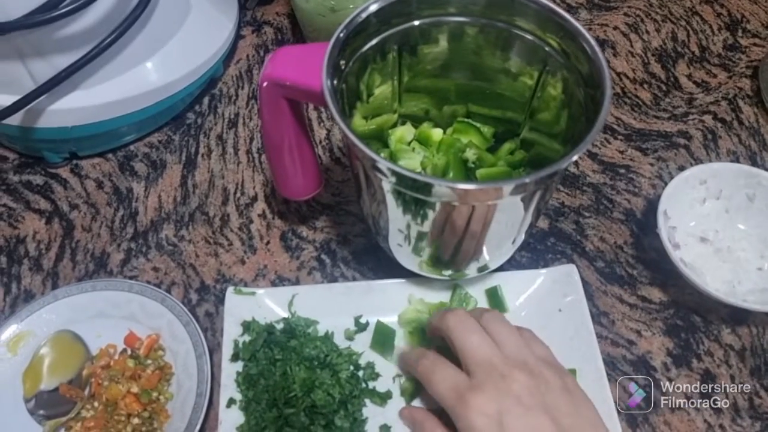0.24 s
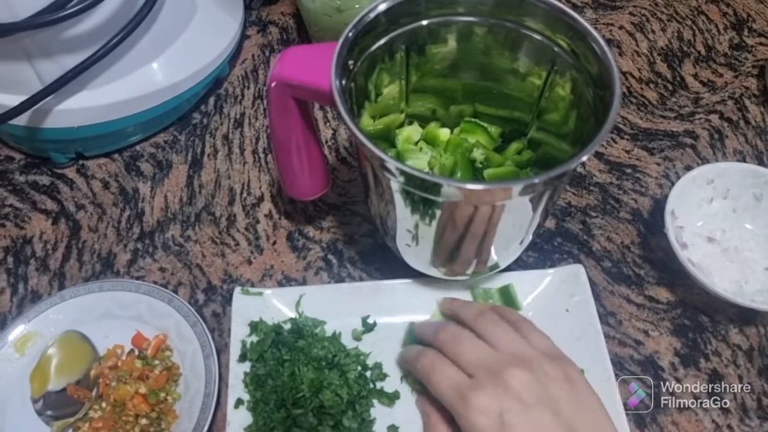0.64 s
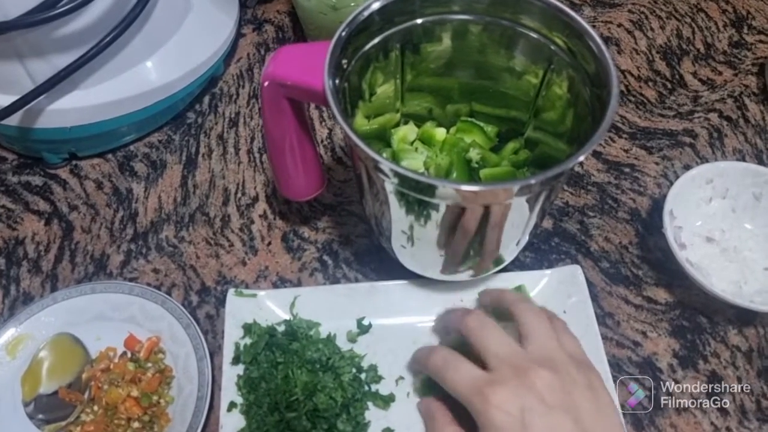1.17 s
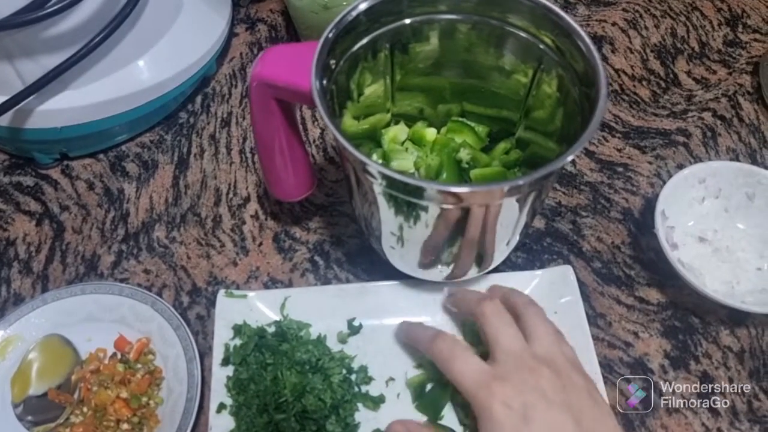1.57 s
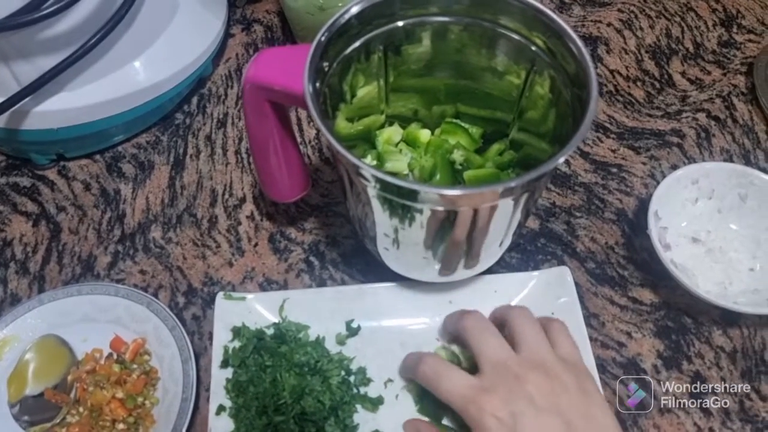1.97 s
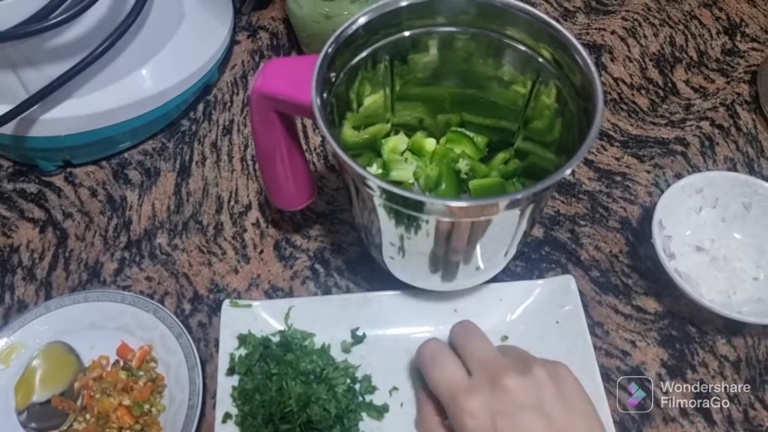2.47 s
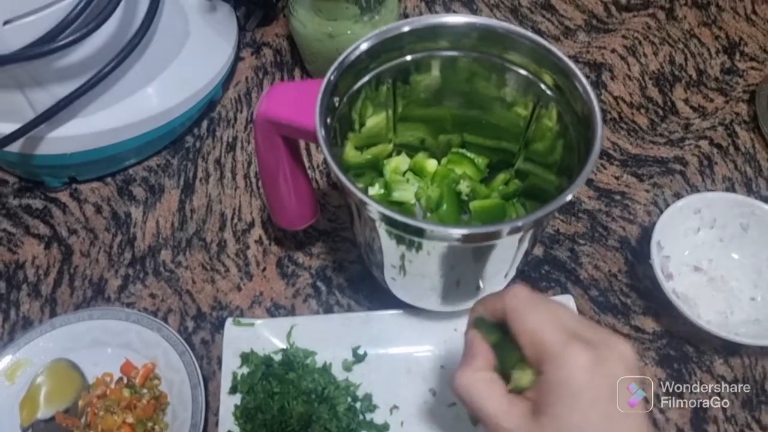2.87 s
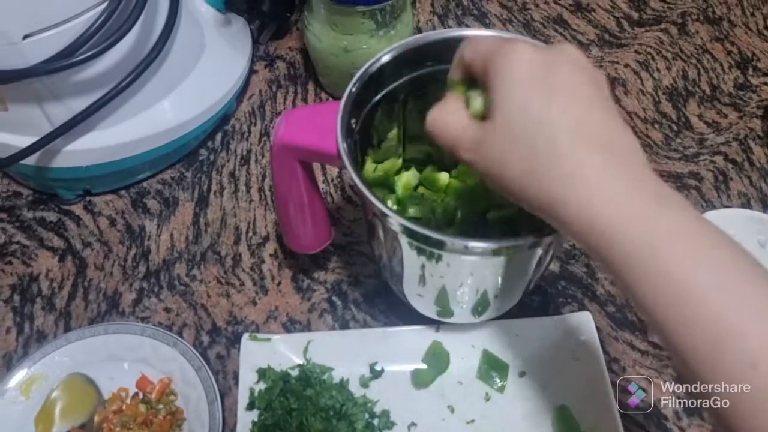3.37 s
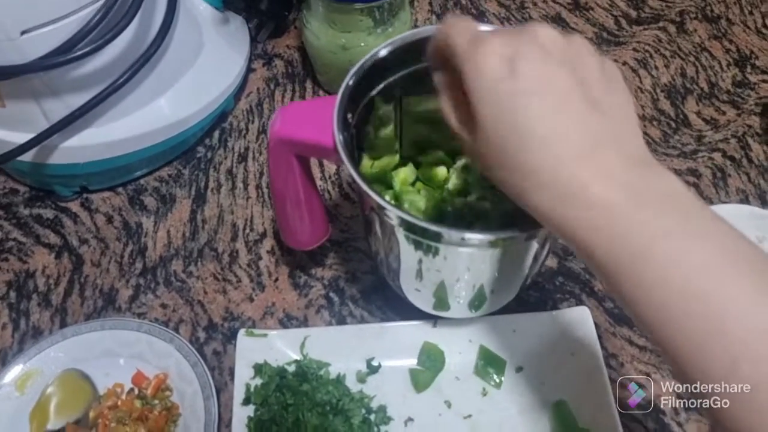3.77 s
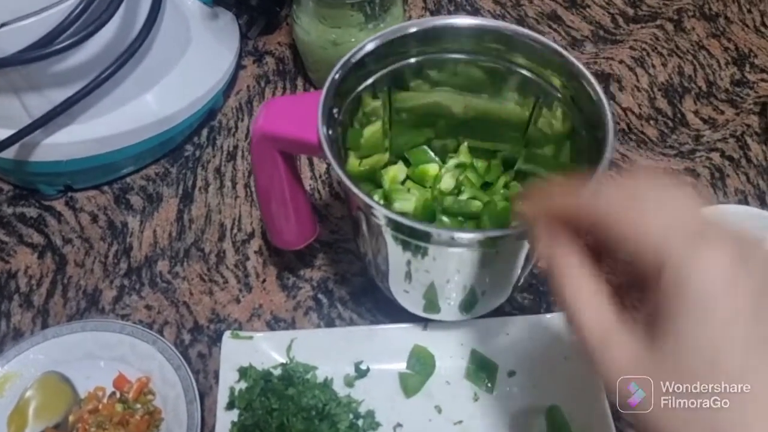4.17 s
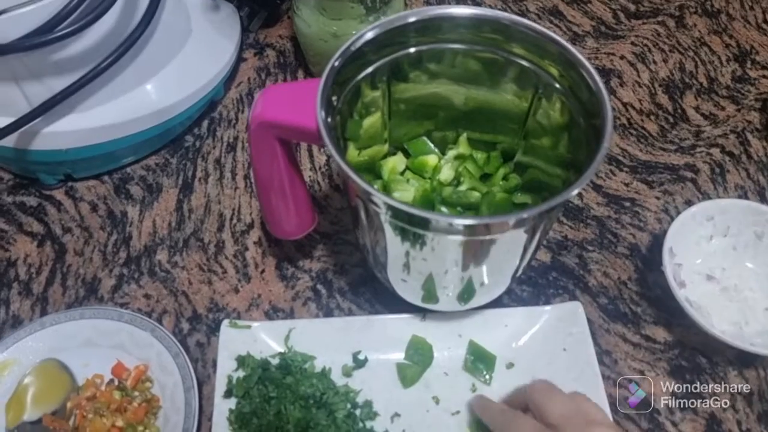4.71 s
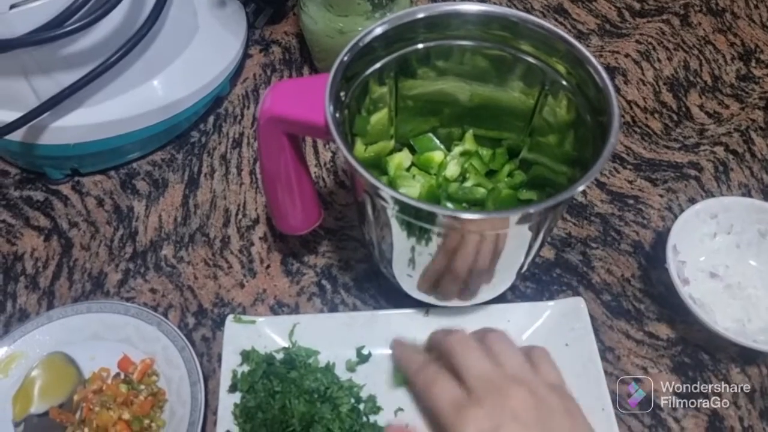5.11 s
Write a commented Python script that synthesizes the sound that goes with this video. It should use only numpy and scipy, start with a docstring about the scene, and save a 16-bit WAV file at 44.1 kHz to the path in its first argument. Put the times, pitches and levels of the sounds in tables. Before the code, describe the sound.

A ceramic tray knocks and clacks on a stone counter as fingers gather wet chopped pepper, over a steady low appliance drone.

```python
"""A hand gathers chopped pepper on a ceramic tray on a stone counter in a kitchen, heard in stereo close by.
Throughout: an appliance drone (coloured noise), mains hum (a sine) and far rumble (low noise).
From 0.2 s the tray knocks on its edges (decaying modes, answered by the room) as fingers rustle (noise swells).
From 2.3 s a low boom (a sine) swells three times and pieces snap apart (noise bursts); from 3.2 s the tray
knocks on its corners, and from 4.6 s it mostly lands flat, ending with three close touches."""
import sys
import numpy as np
from scipy import signal
from scipy.fft import rfft, irfft, next_fast_len
from scipy.io import wavfile
from scipy.ndimage import map_coordinates

SR = 44100
rng = np.random.default_rng(int(sys.argv[2]) if len(sys.argv) > 2 else 0)


def int16_out(signal):
    """Quantize to a 16-bit WAV file."""
    q = np.round(np.clip(np.atleast_2d(signal).T, -1, 1) * 32767)
    wavfile.write(sys.argv[1], SR, q.astype(np.int16))


N = 235802

# spectrum of crisp hiss and snaps from wet pieces: f/Hz, relative level/dB
CRISP_COLOUR = [(3000, -120), (4500, 1.5), (6500, 2.5), (10000, -5.5), (15500, -15)]


def amp(db):
    """dB to gain."""
    return 10 ** (np.asarray(db) / 20)


def unit(x):
    """x at rms 1."""
    return x / np.sqrt(np.mean(x ** 2) + 1e-20)


def along(points, hz):
    """Interpolate (f/Hz, value) points on a log frequency axis."""
    f, v = np.transpose(points)
    return np.interp(np.log(hz + 1), np.log(f + 1), v)


def wobble(rate):
    """A smooth random curve, rate knots a second."""
    knots = rng.standard_normal(int(N * rate / SR) + 4)
    return map_coordinates(knots, [np.arange(N) * rate / SR])


def bells(middle, half):
    """Smooth rises and falls around each middle time, one row each."""
    return np.exp(-.5 * ((np.arange(N) / SR - middle) / half) ** 2)


def filtered(x, response):
    """x times a complex response of frequency."""
    m = next_fast_len(N + SR // 2)
    spectrum = rfft(x, m) * response(np.fft.rfftfreq(m, 1 / SR))
    return irfft(spectrum, m)[..., :N]


def ports(pair, colour_db):
    """Two noises coloured and mixed as the two microphone ports hear a diffuse sound, at rms 1."""
    # likeness of the two ports: f/Hz, left-right correlation
    likeness = [(45, 1), (140, 0.97), (200, 0.95), (300, 0.68), (450, 0.2), (800, 0.46), (1600, 0.45),
                (3000, 0.2), (4000, 0.04), (15000, .02)]
    # phase between the ports: f/Hz, left leads/rad
    left_lead = [(45, 0.87), (100, -0.1), (150, 0.5), (200, 0), (400, 0.08), (500, -0.05), (700, -2.5),
                 (1600, -3), (3000, -2)]
    # balance of the ports: f/Hz, left over right/dB
    left_lean = [(45, -2.5), (100, -2.5), (200, 0), (300, -5.5), (500, -1.6), (900, -1.1), (1600, 1.7),
                 (2500, 6.5), (4000, -1), (15000, 0)]

    def mid_side_response(hz):
        turn = np.arccos(np.clip(along(likeness, hz), -1, 1)) / 2
        return amp(colour_db(hz)) * [np.cos(turn), np.sin(turn)]

    def port_response(hz):
        half = np.array([[.5], [-.5]])  # left and right share each difference
        return amp(half * along(left_lean, hz)) * np.exp(1j * half * along(left_lead, hz))

    mid, side = filtered(pair, mid_side_response)
    return unit(filtered([mid + side, mid - side], port_response))


def far_rumble():
    """Distant low noise whose level wavers slowly."""
    # spectrum of the rumble: f/Hz, relative level/dB
    rumble_colour = [(15, -120), (30, -24.5), (38, -11), (45, -5.5), (53, -7), (65, -16), (90, -120)]
    level_db = -62 + 2.5 * wobble(5.7)
    return amp(level_db) * ports(rng.standard_normal((2, N)), lambda hz: along(rumble_colour, hz))


def low_boom():
    """A low sine with a slightly wandering phase swells and fades."""
    # swells of the boom: middle t/s, peak level/dB, half length t/s
    boom_swells = [(2.298, -58, 0.09), (2.443, -43, 0.079), (2.75, -52, .05)]
    s, peak_db, half = np.transpose(boom_swells)[:, :, None]
    swell = (amp(peak_db) * bells(s, half)).sum(axis=0)
    boom_hz = 44.6
    boom = swell * np.sin(2 * np.pi * boom_hz * np.arange(N) / SR + .6 * wobble(8))
    return boom * amp([[-1.2], [1.2]])  # a little stronger on the right


def mains_hum():
    """A sine at twice the mains frequency, its level and phase wavering."""
    hum_hz = 99.9
    waver = amp(1.6 * wobble(14))
    hum = amp(-54.5) * waver * np.sin(2 * np.pi * hum_hz * np.arange(N) / SR + .3 * wobble(5.9))
    return hum * amp([[-1.1], [1.1]])


def appliance_drone():
    """Steady appliance noise, raised in bands by resonances such as the room's low ones."""
    # broad spectrum of the drone: f/Hz, relative level/dB
    drone_colour = [(32, -47), (55, -9.5), (102, -14.5), (123, -6.5), (190, -12), (240, -14.5), (326, -6.5),
                    (537, -7), (619, -11.5), (1200, -10.5), (1420, -17.5), (2230, -23), (3500, -33.5),
                    (5500, -46), (8500, -53.5), (11300, -60), (13000, -55.5), (16000, -65.5)]
    # resonances: centre f/Hz, width/Hz, level over the broad spectrum/dB
    resonances = [(136, 150, 1), (304.6, 59.6, 6), (487.5, 24.3, 4.5), (711, 11.2, 8.5), (6800, 380, 4)]

    def colour_db(hz):
        bumps = sum(db * np.exp(-.5 * ((hz - c) / w) ** 2) for c, w, db in resonances)
        return along(drone_colour, hz) + bumps

    drone = ports(rng.standard_normal((2, N)), colour_db)
    return amp(-45.5 + 0.17 * wobble(0.68)) * drone


def background():
    """Everything heard behind the hand and tray."""
    return appliance_drone() + mains_hum() + far_rumble() + low_boom()


def rustles():
    """Fingers slide among wet pieces: swells of clumped crisp grain over a dull rub of the palm."""
    # strokes of the fingers: middle t/s, crisp hiss level/dB, dull rub level/dB, half length t/s
    finger_strokes = [(.365, -80, -78, .012), (.44, -79, -76, .025), (.85, -80, -76, .015),
                      (1.03, -82, -82, .008), (1.58, -75, -72, .025), (2.0, -76, -66, .03),
                      (2.06, -73, -64, .025), (2.41, -79, -72, .03), (2.65, -72, -68, .022),
                      (2.83, -80, -74, .025), (3.5, -72, -72, .07), (3.89, -78, -64, .035),
                      (3.98, -78, -72, .02), (4.82, -80, -74, .04)]
    # spectrum of the dull rub: f/Hz, relative level/dB
    rub_colour = [(900, -120), (1400, -10), (2000, -5.5), (3200, 0), (4500, -5.5), (7000, -120)]
    s, crisp_db, dull_db, half = np.transpose(finger_strokes)[:, :, None]
    strokes = bells(s, half)
    hiss, rub = rng.standard_normal((2, 2, N))
    grain = hiss * amp(3 * wobble(400) + 1.7 * wobble(60))  # fine and coarser clumps
    crisp_swell = (amp(crisp_db) * strokes).sum(axis=0)
    dull_swell = (amp(dull_db) * strokes).sum(axis=0)
    crisp = crisp_swell * ports(grain, lambda hz: along(CRISP_COLOUR, hz))
    dull = dull_swell * ports(rub, lambda hz: along(rub_colour, hz))
    return crisp + dull


def snaps():
    """Crisp pieces part in short noise bursts that die in about 9 ms."""
    # pieces parting: t/s, relative level/dB
    partings = [(2.37, -79), (2.4757, -63.5), (2.5092, -68.5), (2.633, -55.5), (3.8784, -76), (3.967, -77)]
    bursts, t = np.zeros((2, N)), np.arange(400) / SR
    for s, db in partings:
        burst = amp(db + 9 - 60 * t / 0.0091) * rng.standard_normal((2, len(t)))
        bursts[:, round(s * SR):][:, :len(t)] += burst
    return filtered(bursts, lambda hz: amp(along(CRISP_COLOUR, hz)))


def echo_tail():
    """A fresh stereo kitchen tail, left energy 1; each frequency dies at its own speed."""
    # decay of the room: f/Hz, t60/s
    room_decay = [(500, 0.35), (1300, 0.66), (2400, 0.7), (5000, 0.5), (10000, 0.65)]
    # colour of the echo at its start: f/Hz, relative level/dB
    room_colour = [(500, 15), (1300, 0), (2400, -1.5), (5000, 6), (10000, -4)]
    hz, t, z = signal.stft(rng.standard_normal((2, SR // 2)), SR, nperseg=256)
    decay_db = along(room_colour, hz)[:, None] - 60 * t / along(room_decay, hz)[:, None]
    tail = signal.istft(z * amp(decay_db), SR, nperseg=256)[1]
    return tail / np.linalg.norm(tail[0])


def small_modes(t, count):
    """The dense, weak upper modes: count short modes at random frequencies, weaker towards the treble."""
    hz = 3300 * 2.9 ** rng.random((count, 1))
    level_db = -9 * np.log2(hz / 4500) + rng.normal(0, 2, (3, count, 1)) - 60 * t / 0.016
    cycles = hz * t + rng.random((3, count, 1))
    return (amp(level_db) * np.sin(2 * np.pi * cycles)).sum(axis=1)


def tray():
    """Each knock lands on one of six spots of the foot, so mode families ring at that spot's strengths."""
    # knocks: t/s, relative level/dB, spot, thud level/dB, brightness/dB per octave, relative click level/dB,
    # left over right/dB, pitch shift/%
    tray_knocks = [(0.215, -24.5, "near edge", -16, -5.5, -65, 12.5, 0.5),
                   (0.233, -30, "side edge", -14, -1, -54, 12, 1),
                   (0.388, -28, "side edge", -15, -4.5, -55, 15, 2.5),
                   (0.41, -37, "side edge", -12, -8, -43.5, 9, 2),
                   (0.738, -14.5, "near edge", -22.5, -0.5, -56, 13, -0.2),
                   (0.753, -24.5, "near edge", -17, -7, -60, 9, 0.5),
                   (1.167, -9, "near edge", -22, 1, -56.5, 12, -.6),
                   (1.473, -12, "near edge", -22.5, -2.5, -54, 11.5, 1.5),
                   (1.771, -7, "near edge", -27, 0.7, -58, 14.5, -0.3),
                   (1.781, -30.5, "side edge", -9, .3, -56, 5.0, -0.5),
                   (1.998, -35, "rim", -16, 4.5, -45, 14, 2.5), (2.044, -31, "rim", -8.5, 4, -48, 9, 0),
                   (2.137, -5, "side edge", -25.5, 0.5, -66, 12.5, 2),
                   (3.262, -14, "near corner", -20.5, -1.2, -41, 14.5, -.3),
                   (3.367, -27.5, "near corner", -10, -4, -43, 9, 0),
                   (3.38, -24.5, "far corner", -27, -2, -37, 4.5, -.3),
                   (3.407, -5, "far corner", -30.5, 1.4, -45.5, 14.5, -0.03),
                   (3.463, -25, "far corner", -17.5, 1, -56, 8, .1),
                   (3.479, -25, "rim", -15.5, 2, -51.5, 5, -.3),
                   (4.613, -2, "flat", -31.5, -0.7, -49.5, 8.5, -0.06),
                   (4.695, -22, "rim", -8.5, 0, -55.5, 10.5, 0), (5.166, -22, "flat", -29, 2, -55, 4, -0.5),
                   (5.172, -0.5, "flat", -30.5, 2, -48.5, 5.5, -.3),
                   (5.177, -4, "flat", -23.5, .3, -55, 5, -0.4)]
    # where the foot lands: ten relative levels/dB of the mode families above the thud, low to high;
    # ring length factor (the hand damps the modes), second touch level/dB
    landing_spots = {"near edge": (-19, -12, -8, -13.5, -15.5, -19, -9.5, -21, -22, -31, 1.0138, -9.5),
                     "side edge": (-24, -11.5, -25.5, -11.5, -22, -34, -13, -20.5, -27.5, -40.5, 0.82, -10.5),
                     "far corner": (-7, -19.5, -27.5, -18.5, -7.5, -13, -25, -18.5, -27.5, -38, 0.98, -36),
                     "near corner": (-10, -21, -16, -23.5, -17, -13.5, -18, -27.5, -32.5, -50.5, 1.09, -10.5),
                     "rim": (-8, -22, -25.5, -19.5, -22, -20, -26.5, -31.5, -29, -39, 1, -17),
                     "flat": (-20, -21, -21, -12, -21.5, -16.5, -11.5, -19.5, -22, -33.5, 1.01, -8.5)}
    # upper limits of the mode families, thud first: f/Hz
    family_tops = [1100, 1320, 1600, 1850, 2060, 2250, 2400, 2850, 3400, 4500]
    # modes of the tray: f/Hz, level within its family/dB, t60 before the ring factor/s, left over right/dB,
    # left leads/rad
    tray_modes = [(809, 1, 0.034, -5, 4.5), (983, 1.5, 0.056, 3.5, 0), (1199, -1.5, 0.022, -2.5, 1.5),
                  (1273, 3, 0.031, 4, -0.04), (1372, 2.5, 0.031, 0.5, 0), (1553, -6.5, 0.077, -5.5, 5.5),
                  (1778, 3, 0.022, -3.5, 2), (1923, 6, 0.024, -4, -2), (1960, -4, 0.062, -7.5, 3),
                  (2136, -5, 0.093, 3, 0.7), (2392, -1, 0.051, 2, -0.6), (2477, 1, 0.034, 1, 1.15),
                  (2530, -9.5, 0.037, 5.5, 2), (2735, -9, 0.056, -5, -0.8), (3050, 0.5, 0.028, 0.5, -3),
                  (3178, -10.5, 0.082, -11.5, -1), (3527, 0.5, 0.019, 8, 2), (3790, 0, 0.02, 1, 3),
                  (3886, -11, 0.045, -5, 12), (4223, -8.5, 0.039, -2.5, 4.5), (4860, 1.5, 0.023, -1, 2.5),
                  (4975, -5.5, 0.031, -14.5, 2.5), (5345, -2.5, 0.026, -5.5, 2.5),
                  (5795, -8, 0.042, -19.5, -2), (6660, -12, 0.043, -1, -2.1), (7320, -16, 0.015, -12, 0.5),
                  (7800, -16.5, 0.057, -12, 2), (8730, -31, .03, 2, 5.5), (9950, -23, 0.026, -7, 1)]
    out, t = np.zeros((2, N + SR)), np.arange(SR // 5) / SR
    hz, mode_db, t60, lean_db, lead = np.transpose(tray_modes)[:, :, None]
    family = np.searchsorted(family_tops, hz[:, 0])
    # three feeds: left port, right port, into the room
    side = np.array([.5, -.5, 0])[:, None, None]
    far = np.array([0, 1, 0])[:, None, None]
    contact = (1 - np.exp(-t / 0.0011)) ** 2  # the foot rolls into contact
    for s, db, spot, thud_db, bright_db, click_db, pan_db, shift in tray_knocks:
        *upper_db, ring, again_db = landing_spots[spot]
        tilt_db = bright_db * np.log2(hz / 2000) * (family[:, None] > 0)  # the thud is not tilted
        family_db = np.array([thud_db, *upper_db])[family, None]
        uneven_db = rng.normal(0, 1, hz.shape)
        level_db = family_db + tilt_db + mode_db + uneven_db + side * (lean_db + pan_db)
        # the hand's weight detunes the modes a little
        pressed_hz = hz * (1 + shift / 100 + rng.normal(0, 0.0049, hz.shape))
        phase = 2 * np.pi * pressed_hz * t - far * lead  # all modes start together at the near port
        modes = amp(level_db - 60 * t / (t60 * ring)) * np.sin(phase)
        click_noise = np.diff(rng.standard_normal((3, len(t) + 1)))
        click = amp(click_db + 0.5 - 60 * t / 0.027) * click_noise
        dense = amp(upper_db[-1] + 2.5 * bright_db - 10.0) * small_modes(t, count=50)
        touch = amp(db + 2.0) * contact * (modes.sum(axis=1) + dense + click)
        # the foot touches again 1.6 ms later
        left, right, into_room = touch + amp(again_db) * np.roll(touch, 72, axis=1)
        echo = signal.fftconvolve(into_room[None], echo_tail(), axes=1)
        start = round(s * SR) - 60  # the onset is heard a moment after first contact
        out[:, start:start + len(t)] += [left, right]
        walls = start + 200  # first walls answer after a few ms
        out[:, walls:walls + echo.shape[1]] += amp(-8.0) * echo
    return out[:, :N]


def scene():
    """Kitchen background, fingers among the pieces and the tray in front."""
    return background() + rustles() + snaps() + tray()


def record(dry):
    """The recorder rounds off peaks near full scale and keeps nothing above its band limit."""
    top_hz = 15750
    soft = dry / (1 + np.abs(dry / .99) ** 24) ** (1 / 24)
    return filtered(soft, lambda hz: hz < top_hz)


dry = scene()
out = record(dry)
int16_out(out)
```